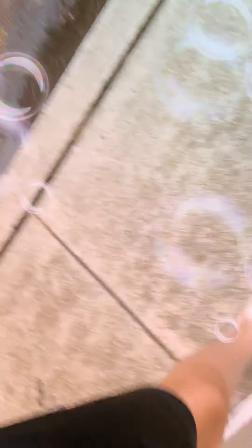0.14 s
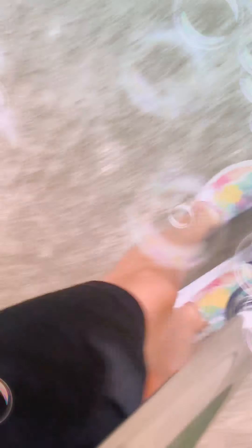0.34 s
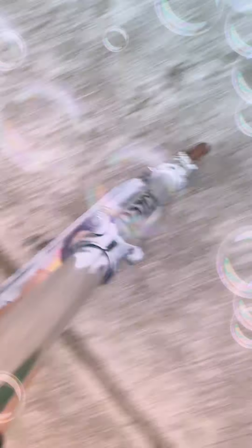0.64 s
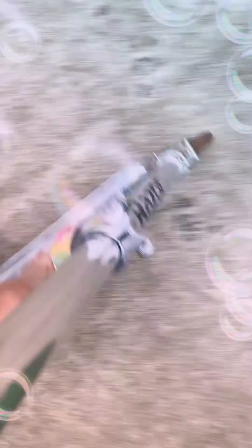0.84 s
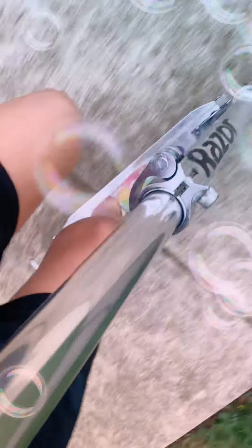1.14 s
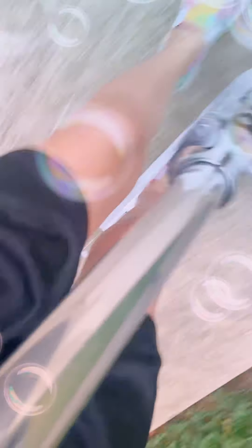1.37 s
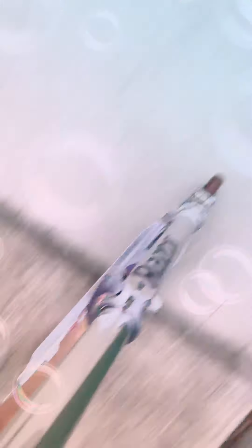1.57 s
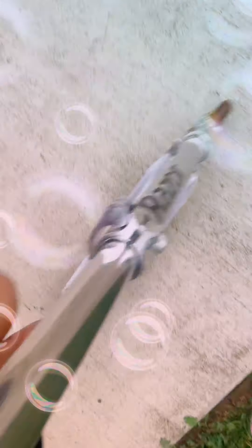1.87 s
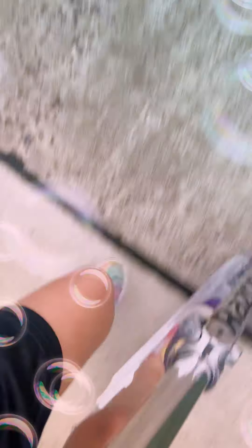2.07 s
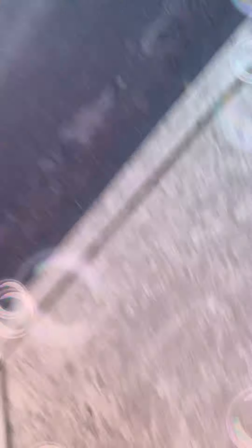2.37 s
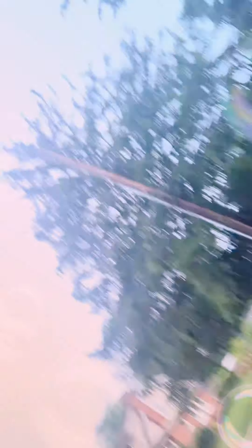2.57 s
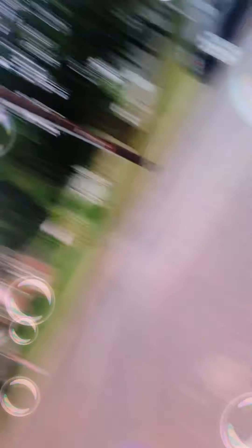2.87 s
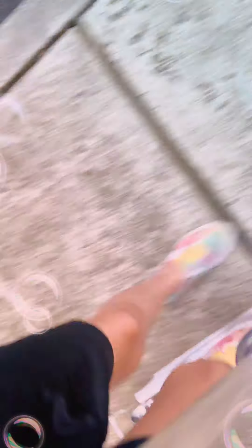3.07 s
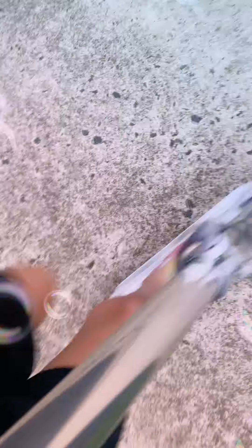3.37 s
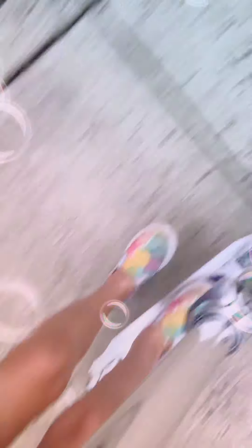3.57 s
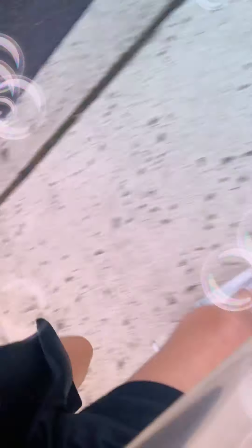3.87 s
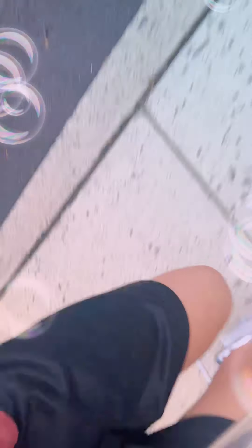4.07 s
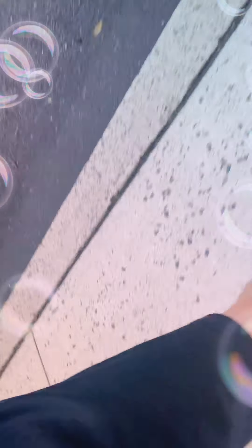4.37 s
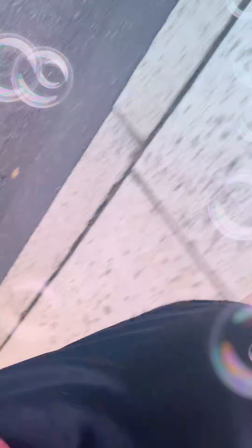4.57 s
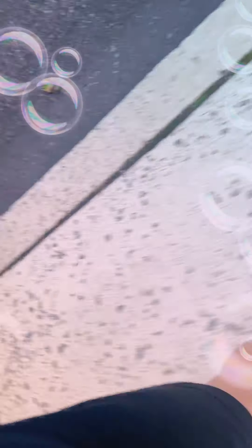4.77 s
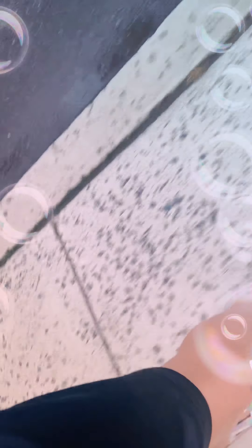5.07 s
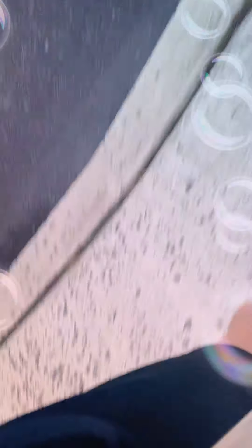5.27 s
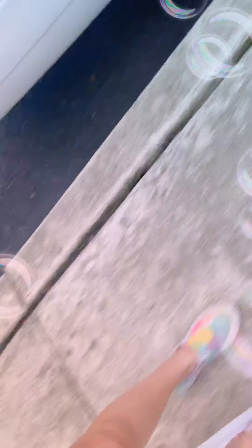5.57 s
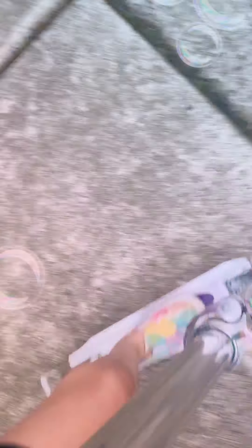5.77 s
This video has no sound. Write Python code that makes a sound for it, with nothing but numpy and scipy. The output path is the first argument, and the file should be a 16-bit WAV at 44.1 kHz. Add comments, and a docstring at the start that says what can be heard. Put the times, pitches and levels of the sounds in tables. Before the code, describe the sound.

A kick scooter rolls on a concrete sidewalk outdoors, the microphone riding on its handlebar, close and dry. After a softer start, two seconds of dense thumps, low rumble and gritty crunch come with a loose metal part chattering brightly. It coasts quietly for about a second, gets knocked hard again, calms with tiny metal pings, then ends on strong knocks.

```python
"""A kick scooter rolls along a concrete sidewalk, the microphone riding on its handlebar.
It starts on smooth ground, soon meets two seconds of joints and rough stretches, coasts for about a second,
is knocked again, with small metal pings in the next calm, and ends on harder knocks.
Throughout, random impacts of grit drive the filtered frame into a rumble and crunch, and pebbles knock it;
a loose fitting, made of filtered noise bursts and decaying modes, chatters in bright runs when shaken."""
import sys
import numpy as np
from scipy import signal
from scipy.fft import rfft, irfft, next_fast_len
from scipy.io import wavfile
from scipy.ndimage import uniform_filter1d, minimum_filter1d, map_coordinates

SR = 44100
rng = np.random.default_rng(int(sys.argv[2]) if len(sys.argv) > 2 else 0)


def store_pcm(level_fs):
    """Save levels as 16-bit WAV."""
    pcm = np.round(np.clip(level_fs, -1, 1) * 32767).astype(np.int16)
    wavfile.write(sys.argv[1], SR, np.atleast_2d(pcm).T)


N = 261513


def amp(db):
    """Logarithmic level: decibels become an amplitude gain."""
    return 10 ** (np.asarray(db) / 20)


def unit(x):
    """Normalization of energy: scale to rms 1."""
    return x / np.sqrt(np.mean(x ** 2) + 1e-20)


def curves(rows):
    """Linear interpolation: one value per sample for each column after the time."""
    s, *columns = np.transpose(rows)
    return [np.interp(np.arange(N) / SR, s, column) for column in columns]


def wobble(rate):
    """Slow random modulation: a smooth curve through `rate` random knots a second."""
    knots = rng.standard_normal(int(N * rate / SR) + 4)
    return map_coordinates(knots, [np.arange(N) * rate / SR])


def body(spectrum, size=8192):
    """Minimum phase: the causal impulse response, of energy 1, of a body with this spectrum."""
    hz, db = np.transpose(spectrum)
    bins_hz = np.fft.rfftfreq(size, 1 / SR)
    gain = amp(np.interp(np.log(bins_hz + 1), np.log(hz), db))
    cepstrum = irfft(np.log(gain))
    # folding the cepstrum onto positive times makes the response causal
    fold = 1 + np.sign(size / 2 - np.arange(size)) * (np.arange(size) > 0)
    response = irfft(np.exp(rfft(cepstrum * fold)))[:size // 2]
    return response / np.linalg.norm(response)


def through(x, response):
    """Linear filtering: an excitation convolved with an impulse response."""
    return signal.fftconvolve(x, response)[:len(x)]


def running_rms(x, seconds):
    """Short-term level: the root of the energy averaged over a moving window."""
    window = max(int(seconds * SR), 1)
    return np.sqrt(np.abs(uniform_filter1d(x ** 2, window)) + 1e-12)


def peaking(x, seconds):
    """Normalization of the peak: the loudest stretch of this length gets rms 1."""
    return x / running_rms(x, seconds).max()


def add(track, s, x):
    """Superposition: mix x into the track at time s."""
    part = track[max(round(s * SR), 0):][:len(x)]
    part += x[:len(part)]


def grit(rate, spread_db):
    """Shot noise: random little impacts, on average `rate` a second, of uneven size, at rms 1."""
    struck = rng.random(N) < rate / SR
    strength = rng.standard_normal(N) * amp(spread_db * rng.standard_normal(N))
    return unit(struck * strength)


def ring(modes, t, scatter_db):
    """Modal decay: damped sinusoids, struck at new strengths and phases each time."""
    total = 0
    for hz, db, t60 in modes:
        decay = amp(db + scatter_db * rng.standard_normal() - 60 * t / t60)
        total = total + decay * np.sin(2 * np.pi * hz * t + rng.uniform(0, 2 * np.pi))
    return total


# Rumbling frame. Each row: frequency in Hz, relative spectral level in dB.
FRAME_SPECTRUM = [(40, -49), (75, -6), (110, 4.5), (200, -0.5), (300, 1), (420, 0.5), (500, -9), (600, -20),
                  (720, -27.5), (1200, -59.5), (3000, -90)]
# Grit crushed under the wheels. Each row: frequency in Hz, relative spectral level in dB.
CRUNCH_SPECTRUM = [(250, -31.5), (620, -8), (1000, 0), (1350, -2.5), (1700, -2), (2200, -11.5), (3000, -23),
                   (3600, -20.5), (5000, -32.5), (9000, -32.5), (16000, -70)]
# Metal fizzing as the wheels roll. Each row: frequency in Hz, relative spectral level in dB.
FIZZ_SPECTRUM = [(2500, -44), (3600, -15), (5200, -14), (6500, -3), (7600, -17), (9700, -8.5),
                 (11200, -18.5), (14000, -28.5), (15500, -23.5)]
# Wheels and bearings hissing. Each row: time in seconds, level in dB before a trim.
BEARING_HISS = [(0, -69), (.12, -84), (.22, -68), (.48, -78), (.6, -59.5), (1.1, -73.5), (1.6, -64.5),
                (1.95, -73), (2.4, -74), (2.86, -84), (3.1, -60), (3.3, -78.5), (3.58, -59.5),
                (3.78, -57.5), (4.34, -82.5), (4.98, -67), (5.22, -72.5), (5.37, -54.5), (5.55, -68.5),
                (5.93, -59)]
HISS_OVER_CRUNCH_DB = -20  # the metal fizzes along with the crunch


def rolling(rumble_gain, crunch_gain):
    """Roughness excitation: the concrete's grain drums the frame, crunches and makes the metal fizz."""
    hiss_db, = curves(BEARING_HISS)
    hiss_gain = np.hypot(amp(hiss_db + 1), amp(HISS_OVER_CRUNCH_DB) * crunch_gain)

    clumps = wobble(65)
    road = grit(rate=1600, spread_db=2.5) * amp(1.8 * clumps)
    rumble = through(road, body(FRAME_SPECTRUM))
    rumble = rumble / running_rms(rumble, 0.051)

    # sand is crushed in short flurries, which reach up into the treble
    flurry_db = 3.5 * clumps + 2.8 * wobble(170)
    sand = grit(rate=9000, spread_db=2.5) * amp(flurry_db)
    crunch = through(0.29 * road + sand, body(CRUNCH_SPECTRUM))
    crunch = crunch / running_rms(crunch, 0.25)

    fizz = through(grit(rate=23000, spread_db=8.0), body(FIZZ_SPECTRUM))
    fizz = fizz * unit(amp(flurry_db / 2))
    return amp(-0.2) * rumble_gain * rumble + crunch_gain * crunch + hiss_gain * fizz


# Coasting on smooth concrete.
# Each row: time in seconds, frame rumble in dB before a trim, grit crunch in dB.
SMOOTH_GROUND = [(0, -43.5, -56.5), (.11, -39.5, -67.5), (.5, -40.5, -60.5), (1.35, -18, -54),
                 (2.08, -42.5, -72), (2.5, -40.5, -67.5), (2.9, -46, -74), (3.3, -37, -67),
                 (3.75, -31.5, -44.5), (4.33, -34, -63.5), (4.6, -31, -63), (5.2, -32.5, -62.5),
                 (5.55, -35, -59), (5.93, -25, -67)]
# Rough stretches. Each row: start in seconds (the middle of the rise), length in seconds,
# frame rumble in dB before a trim, grit crunch in dB.
ROUGH_STRETCHES = [(0.159, 0.066, -21, -48), (0.259, 0.17, -17.5, -54), (0.548, 0.1, -19.5, -47),
                   (0.634, 0.084, -13.5, -46), (0.777, 0.16, -15.5, -50.5), (0.821, 0.023, -10, -43.5),
                   (.97, .11, -13.5, -47.5), (1.112, 0.22, -16.5, -49), (1.412, 0.059, -15.5, -49),
                   (1.514, 0.14, -16, -49), (1.677, 0.026, -12.5, -41.5), (1.744, 0.21, -24, -57),
                   (1.961, 0.091, -24.5, -55), (2.198, 0.04, -34, -54), (2.337, 0.046, -19.5, -50),
                   (3.046, 0.14, -20.5, -47), (3.354, 0.21, -20.5, -52), (3.535, 0.09, -19.5, -44),
                   (3.681, 0.082, -12, -45), (3.82, 0.16, -15, -49.5), (4.015, 0.1, -19, -49.5),
                   (4.388, 0.17, -24, -51.5), (4.833, 0.076, -22, -54.5), (4.955, 0.11, -25.5, -52),
                   (5.337, 0.07, -18.5, -46), (5.669, 0.1, -20.5, -54), (5.741, 0.15, -14.5, -49.5)]
ATTACK_S, RELEASE_DB_PER_S = 0.008, 420  # rolling onto and off a rough stretch


def pavement():
    """Envelope of excitation: smooth coasting, with a quick swell of rumble and crunch on rough ground."""
    t = np.arange(N) / SR
    rumble, crunch = amp(curves(SMOOTH_GROUND))
    for s, length, rumble_db, crunch_db in ROUGH_STRETCHES:
        rise = np.clip((t - s) / ATTACK_S + .5, 0, 1)
        swell = rise * amp(-RELEASE_DB_PER_S * np.maximum(t - s - length, 0))
        rumble = np.maximum(rumble, amp(rumble_db) * swell)
        crunch = np.maximum(crunch, amp(crunch_db) * swell)
    return rumble, crunch


# A wheel cracking against a hard edge. Each row: frequency in Hz, relative spectral level in dB.
CRACK_SPECTRUM = [(250, -30), (620, 10.5), (800, 0.5), (1050, 0.5), (1350, -4), (1700, -1.5), (2200, -13.5),
                  (3000, -32), (3600, -28.5), (6000, -24.5), (9000, -28), (12000, -64)]
# Wheels striking joints and stones.
# Each row: time in seconds, thump in dB and crack in dB, both before a trim.
JOINTS_AND_STONES = [(0.145, -11, -52), (0.166, -24.5, -29.5), (0.205, -8.5, -30.5), (0.396, -7.5, -62),
                     (0.549, -19.5, -45), (0.697, 1.5, -18.5), (0.825, 1, -25.5), (0.896, -6, -43),
                     (0.995, -6, -28.5), (1.034, -2, -25.5), (1.066, -3.5, -32), (1.187, -2.5, -41),
                     (1.214, 2, -23), (1.312, 5, -30), (1.415, -3.5, -48), (1.441, -2.5, -30),
                     (1.518, -10, -29.5), (1.535, 1, -26), (1.686, -13, -33), (1.754, -19, -37),
                     (2.012, -10, -42), (2.024, 1.5, -21.5), (2.205, -32, -42), (2.257, -20.5, -50),
                     (2.326, -12.5, -49), (2.36, -7, -38), (2.684, -21, -45.5), (2.778, -33, -48.5),
                     (3.025, -10, -40.5), (3.061, -6.5, -34.5), (3.179, -9.5, -28), (3.387, -9, -41),
                     (3.453, -6, -48), (3.577, -7.5, -23.5), (3.69, -5.5, -24.5), (3.751, -0.5, -28),
                     (3.839, -3.5, -50), (3.943, 5, -19.5), (4.046, -2, -30), (4.116, -10, -38),
                     (4.171, -9, -40.5), (4.388, -8.5, -35.5), (4.475, -6, -33.5), (5.272, -11, -42),
                     (5.346, -6, -41), (5.365, 1.5, -28.5), (5.677, -12.5, -40.5), (5.8, 2.5, -16),
                     (5.839, -5.5, -27.5), (5.916, -1, -25)]


def knocks(blows=JOINTS_AND_STONES):
    """Impact excitation: a firm push and a brief shudder thump the frame, with a gritty crack on top."""
    out, t = np.zeros(N), np.arange(SR // 8) / SR
    frame, wheel = body(FRAME_SPECTRUM), body(CRACK_SPECTRUM)
    for s, thump_db, crack_db in blows:
        shudder, scrape = rng.standard_normal((2, len(t)))
        push = np.exp(-((t - .003) / .0003) ** 2)
        jolt = 0.17 * unit(push) + unit(shudder * t * amp(-60 * t / 0.018))
        thump = peaking(through(jolt, frame), 0.002)
        crack = peaking(through(scrape * t * amp(-60 * t / 0.019), wheel), 0.0015)
        add(out, s - .002, amp(thump_db - 4.0) * thump + amp(crack_db - 0.5) * crack)
    return out


PEBBLES_PER_S = 6
# thump and crack over the rolling gains, before the trims in knocks(), and their shared spread
PEBBLE_THUMP_DB, PEBBLE_CRACK_DB, PEBBLE_SPREAD_DB = 7.5, 10.5, 2.5


def pebbles(rumble_gain, crunch_gain):
    """Random impacts: stray pebbles knock the wheels, harder where the pavement is rough."""
    at = rng.integers(0, N, round(PEBBLES_PER_S * N / SR))
    spread_db = PEBBLE_SPREAD_DB * rng.standard_normal(len(at))
    thump_db, crack_db = 20 * np.log10([rumble_gain[at], crunch_gain[at]]) + spread_db
    return knocks(np.transpose([at / SR, thump_db + PEBBLE_THUMP_DB, crack_db + PEBBLE_CRACK_DB]))


# Low resonance of the stem. Each row: frequency in Hz, relative spectral level in dB.
STEM_SPECTRUM = [(15, -37.5), (30, -22.5), (42, -13.5), (55, -1), (76, 2.5), (95, -6), (125, -18),
                 (200, -56.5), (400, -82.5), (1500, -120)]
# The stem swaying on the wheels. Each row: time in seconds, level in dB before a trim.
STEM_SWAY = [(0, -30.5), (.1, -45), (.36, -15), (.48, -38.5), (.6, -17.5), (1.4, -19.5), (2, -23),
             (2.15, -32), (2.5, -35), (2.76, -24), (2.87, -42.5), (3.02, -24.5), (3.55, -25.5), (3.8, -21),
             (4.1, -22.5), (4.4, -29), (4.85, -19.5), (5.55, -24), (5.93, -18.5)]


def stem():
    """Resonance: the long stem, driven by noise, shudders at its low natural frequency."""
    sway_db, = curves(STEM_SWAY)
    shudder = through(rng.standard_normal(N), body(STEM_SPECTRUM))
    return amp(sway_db + 0.13) * shudder / running_rms(shudder, 0.085)


# The loose fitting shaken into runs of bounces.
# Each row: start in seconds, number of contacts, level of the first in dB before a trim.
RATTLE_RUNS = [(.592, 2, -25.5), (.662, 4, -17), (.842, 3, -18.5), (.904, 1, -35), (0.911, 4, -20.5),
               (0.962, 4, -22), (1.026, 3, -20), (1.081, 1, -24), (1.15, 2, -26), (1.196, 3, -26.5),
               (1.226, 2, -23), (1.266, 2, -24.5), (1.325, 1, -26.5), (1.346, 1, -29), (1.457, 2, -24),
               (1.494, 1, -24.5), (1.523, 4, -21), (1.606, 1, -27), (1.694, 1, -26), (1.701, 2, -22.5),
               (1.772, 1, -35.5), (1.799, 3, -25.5), (1.836, 1, -26.5), (1.86, 2, -31), (1.882, 5, -21.5),
               (1.97, 1, -26), (1.986, 1, -26.5), (2.011, 5, -18.5), (2.528, 1, -28.5), (3.109, 4, -24),
               (3.475, 1, -23.5), (3.688, 4, -12), (3.738, 1, -13.5), (3.747, 2, -25), (3.861, 1, -29),
               (3.929, 2, -24), (3.968, 1, -26), (5.175, 1, -35), (5.364, 4, -19), (5.73, 3, -25.5),
               (5.799, 3, -20)]
BOUNCE_S, BOUNCE_JITTER = .009, 0.12  # mean time between contacts and its scatter (share)
BOUNCE_LOSS_DB, BOUNCE_SPREAD_DB = 1, 2  # mean loss per contact, give or take


def rattle():
    """Repeated impact with loss: uneven bounces, harder ones scuffing longer, then a faint rebound."""
    out = np.zeros(N)
    for s, contacts, run_db in RATTLE_RUNS:
        for k in range(round(contacts)):
            spread_db = BOUNCE_SPREAD_DB * rng.standard_normal() * (k > 0)
            db = run_db - BOUNCE_LOSS_DB * k + spread_db
            scuff_s = 0.0028 * amp(0.62 * (db + 27.5))
            add(out, s - .0003, amp(db - 2.5) * tick(scuff_s))
            s = s + BOUNCE_S * (1 + BOUNCE_JITTER * rng.standard_normal())
        add(out, s, amp(db - 24.5) * tick(scuff_s))
    return out


# Buzz of the fitting, before its random colouring.
# Each row: frequency in Hz, relative spectral level in dB.
FITTING_SPECTRUM = [(500, -30.5), (1700, -6.5), (3050, -28), (3550, -16), (4050, -20.5), (4550, -13),
                    (5100, -18.5), (6000, 6.5), (6500, 4.5), (7600, -16), (8700, -4), (10100, -11.5),
                    (11200, -34.5), (15300, -45)]
# Ringing of the fitting.
# Each row: frequency in Hz, relative level in dB before a random scatter, 60 dB decay time in seconds.
FITTING_RING = [(6300, -3, .012), (6545, -3, .028), (8730, -1, .028)]


def tick(scuff_s):
    """Contact noise and modal decay: a brief bright buzz, coloured by where the faces meet, rings on."""
    t = np.arange(SR // 20) / SR
    tilt_db = 2.5 * rng.standard_normal()  # per octave above 6200 Hz
    scatter_db = rng.normal(0, 1.5, len(FITTING_SPECTRUM))
    hz, db = np.transpose(FITTING_SPECTRUM)
    octaves_up = np.maximum(np.log2(hz / 6200), 0)
    colour = body(np.transpose([hz, db + tilt_db * octaves_up + scatter_db]), size=1024)
    contact = rng.standard_normal(len(t)) * t * amp(-60 * t / scuff_s)
    after_ring = amp(-22) * ring(FITTING_RING, t, scatter_db=3)
    return peaking(through(contact, colour), 0.00063) + after_ring


JOSTLES_PER_S = 22
JOSTLE_DB, JOSTLE_SPREAD_DB = -3, 2.5  # mean level over the crunch gain and its spread


def jostle(crunch_gain):
    """Random light contact: stray touches of the fitting, firmer on rough ground."""
    out = np.zeros(N)
    for at in rng.integers(0, N, round(JOSTLES_PER_S * N / SR)):
        touch = amp(JOSTLE_DB + JOSTLE_SPREAD_DB * rng.standard_normal()) * tick(scuff_s=.002)
        add(out, at / SR, crunch_gain[at] * touch)
    return out


# A tap on the small steel part. Each row: frequency in Hz, relative spectral level in dB.
TAP_SPECTRUM = [(2500, -42), (3600, -14.5), (5200, -9), (6400, -1), (7500, -3.5), (9500, -8),
                (11000, -32.5), (15000, -39)]
# Ringing of the small part.
# Each row: frequency in Hz, relative level in dB before a random scatter, 60 dB decay time in seconds.
PING_RING = [(6420, -3, .018), (7470, 0, .032), (8750, -5, .018)]
# The small part pinging on its own. Each row: time in seconds, level in dB before a trim.
PING_TIMES = [(2.206, -50), (2.345, -49), (3.018, -40.5), (4.229, -47.5), (4.39, -44.5), (4.412, -43.5),
              (4.453, -48), (4.557, -45), (4.577, -46), (4.667, -51), (4.841, -50), (4.885, -48),
              (4.987, -46), (5.036, -50)]


def pings():
    """Free vibration: light taps on a small steel part, which rings on faintly in its modes."""
    out, t = np.zeros(N), np.arange(SR // 12) / SR
    metal = body(TAP_SPECTRUM)
    for s, db in PING_TIMES:
        noise = rng.standard_normal(len(t)) * t * amp(-60 * t / 0.0071)
        tap = peaking(through(noise, metal), 0.00043)
        after_ring = amp(-10) * ring(PING_RING, t, scatter_db=3)
        add(out, s, amp(db - 2) * (tap + after_ring))
    return out


def air():
    """White noise: the faint even hiss of the microphone."""
    return amp(-84) * rng.standard_normal(N)


def scene():
    """Superposition: everything reaches the microphone through the frame, close and dry."""
    rumble_gain, crunch_gain = pavement()
    wheels = rolling(rumble_gain, crunch_gain) + knocks() + pebbles(rumble_gain, crunch_gain)
    metal = stem() + rattle() + jostle(crunch_gain) + pings()
    return (wheels + metal + air())[None]


TOP_HZ = 15900  # upper band limit


def record(dry):
    """Peak limiting and band limiting: a fast gain dip tames the biggest jolts, then the top is cut."""
    needed = np.minimum(1, .93 / (np.abs(dry) + 1e-9))
    gain = uniform_filter1d(minimum_filter1d(needed, size=400), size=300)
    padded = next_fast_len(N + SR // 2)
    passed = np.fft.rfftfreq(padded, 1 / SR) < TOP_HZ
    return irfft(rfft(dry * gain, padded) * passed, padded)[..., :N]


dry = scene()
out = record(dry)
store_pcm(out)
```